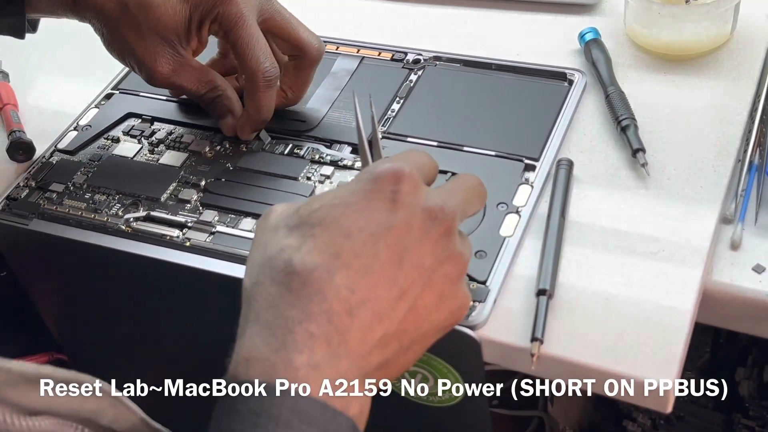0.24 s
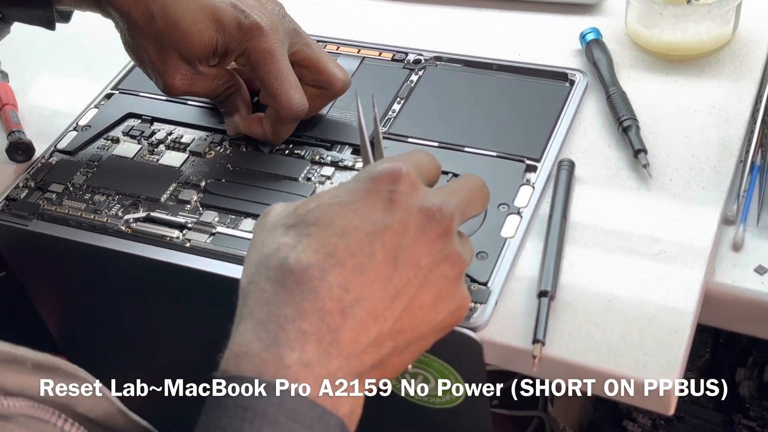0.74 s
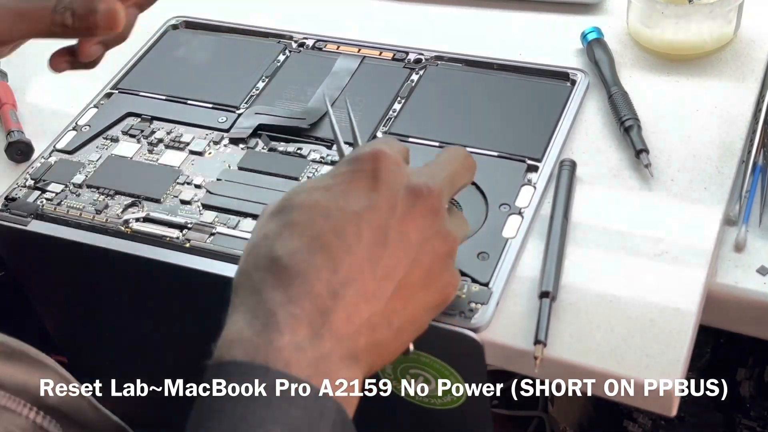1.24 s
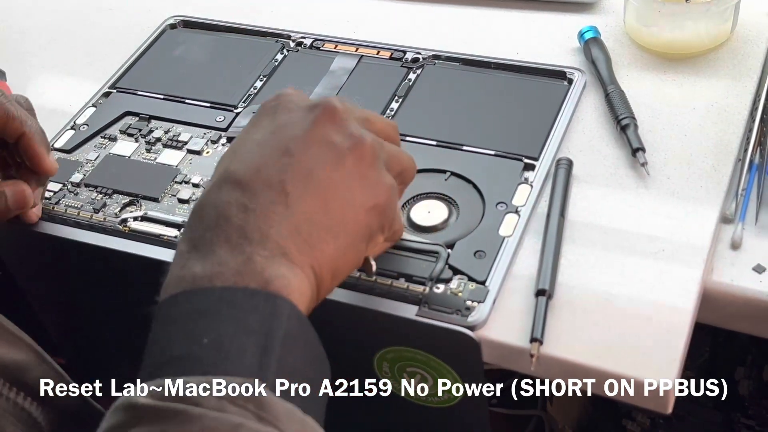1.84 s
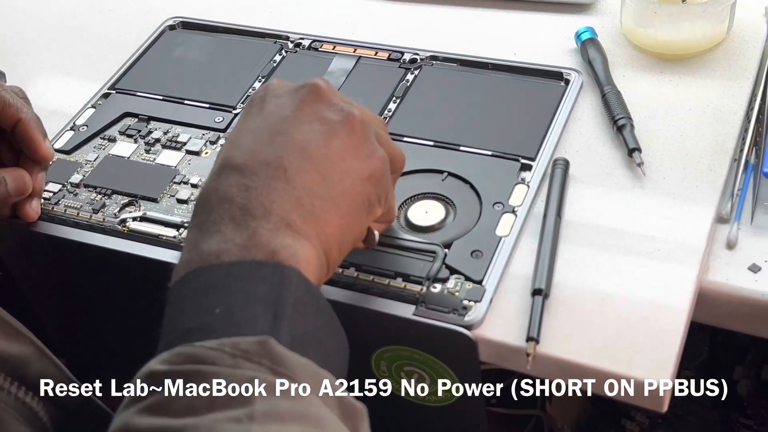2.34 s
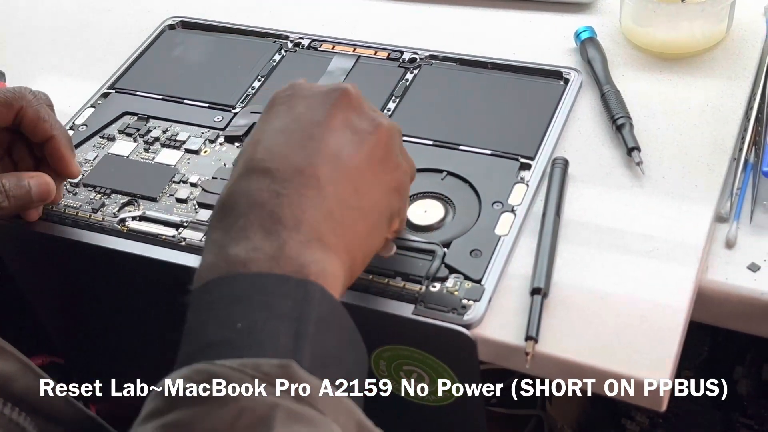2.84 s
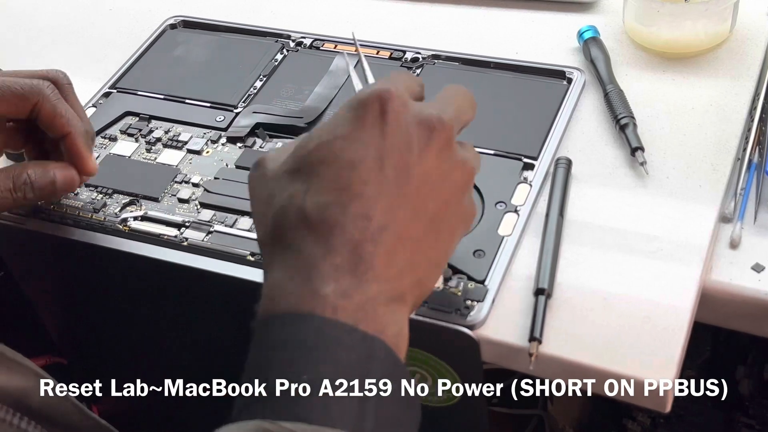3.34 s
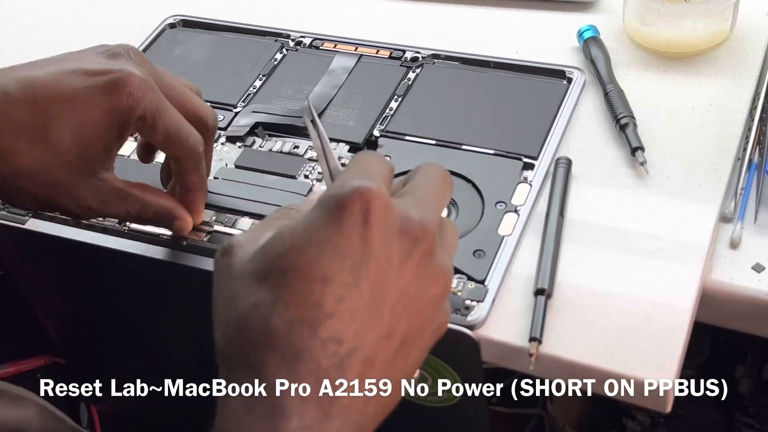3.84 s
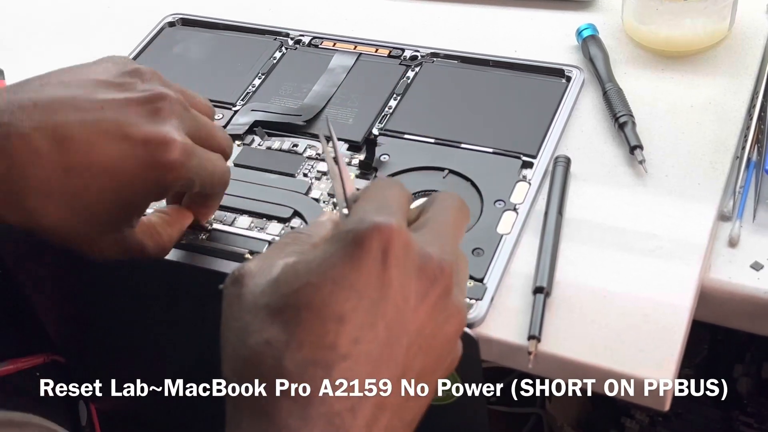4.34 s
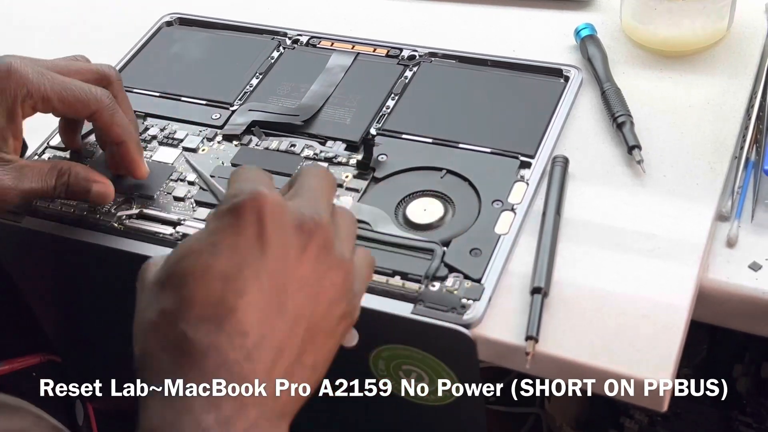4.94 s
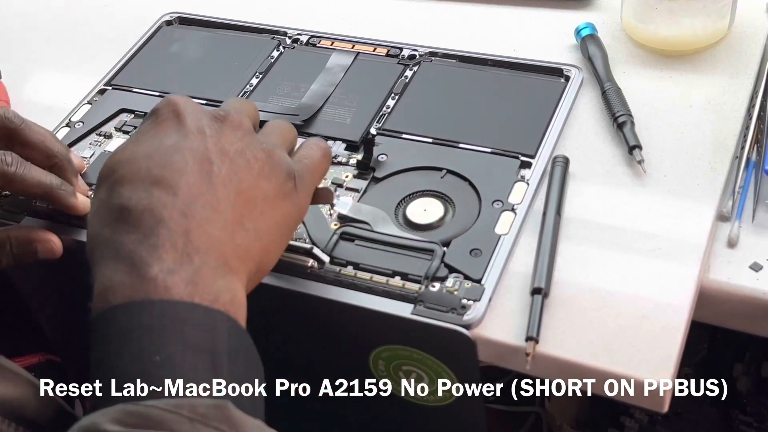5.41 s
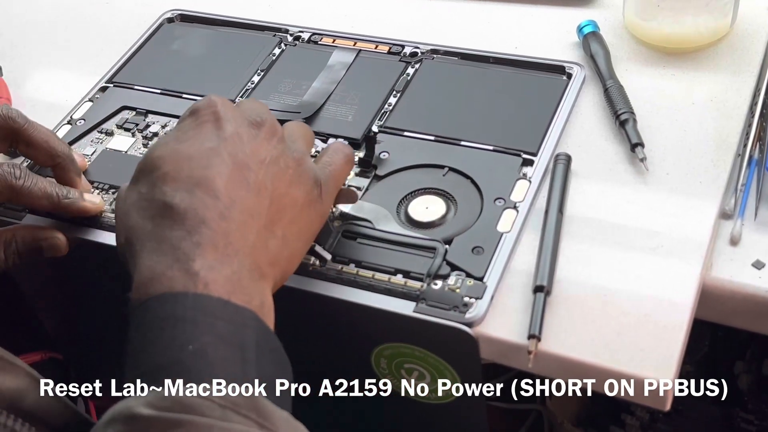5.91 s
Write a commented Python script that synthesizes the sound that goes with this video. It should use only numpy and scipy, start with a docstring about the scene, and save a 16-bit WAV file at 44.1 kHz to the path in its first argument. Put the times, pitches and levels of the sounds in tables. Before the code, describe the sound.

Small-part repair on a workbench, heard by one close microphone without reverberation. Isolated metallic clicks and snaps come in short double or triple strikes, separated by faint airy brushing of hand and sleeve. The loudest two fall just after three seconds and at about four and a half, the latter followed by fine tape crackle. Uneven low thuds of the shaken mount and quiet room hum continue until the almost click-free end.

```python
"""Tweezers on an opened laptop

On a bench, steel tweezers tap, pry and unsnap small plugs on a metal laptop's board: rough contacts ring
sharp modes, crack and rustle. A thin shield can buzzes, hand and sleeve slide (moving bands of friction)
and a taped cable peels in a fine crackle. The bench shakes the microphone mount in slow low throbs.
Mains hum, room noise and hiss lie beneath, swelling and dipping. The sources are dry and close, without
added reverberation; one microphone feeds both channels alike."""
import sys
import numpy as np
from scipy import signal
from scipy.fft import rfft, irfft
from scipy.io import wavfile
from scipy.ndimage import uniform_filter1d

SR = 44100
rng = np.random.default_rng(int(sys.argv[2]) if len(sys.argv) > 2 else 0)


def persist_wave(psi):
    """Save psi, clipped to +-1, as 16-bit WAV."""
    counts = np.round(np.clip(psi, -1, 1) * 32767).astype(np.int16)
    wavfile.write(sys.argv[1], SR, np.atleast_2d(counts).T)


N = 272097  # samples

# Touches of the tweezers: (time [s], case [dB], board [dB], plug [dB], clip [dB], tweezer tips [dB],
# contact decay [ms], ring time [share of each mode's t60], rustle [dB], favoured pitch [Hz])
TOUCHES = [(0.8129, -78, -37, -58, -53.5, -51.5, 1.6, 0.68, -12.5, 6240),
           (0.8180, -59.5, -52, -45, -63, -49.5, 4.4, 0.23, -6.5, 2000),
           (0.885, -60.5, -69.5, -62, -100, -79, 2.1, 0.43, 1, 1990),
           (0.9610, -75, -90, -80, -87, -90, 2.2, .39, 7.5, 8950),
           (1.0247, -64, -66, -59, -73, -69.5, 2.1, 0.45, 8.5, 7440),
           (1.0362, -90, -58, -62.5, -66, -66, 2.7, 0.27, 12, 3260),
           (1.0507, -94, -37, -42.5, -47, -52, 2.1, 0.75, -11, 5300),
           (1.1136, -81, -58, -63.5, -74, -75, 1.4, 0.78, 0, 2080),
           (1.1933, -71, -68, -67, -79, -90, 1.84, 0.37, 3, 3250),
           (1.4710, -68, -78, -71, -80, -84, 2.6, 0.8, 5, 3420),
           (2.071, -49, -59, -47, -54.5, -53.5, 1.57, 0.43, -12, 8920),
           (2.079, -61, -57.5, -59, -61, -74, 2.1, 1, -6, 1680),
           (2.4150, -79, -89, -88, -82, -81, 1.54, 0.42, -4, 8950),
           (2.4450, -85, -87, -95, -79, -83, 1.8, .55, -9, 8850),
           (2.9304, -61.5, -40.5, -38.5, -58.5, -62, 1.05, .39, -3.5, 6100),
           (2.9418, -46.5, -34, -46.5, -59.5, -65, .21, 0.37, -11, 1829),
           (2.965, -48, -36, -62.5, -69, -70, .17, 0.36, -19, 1602),
           (2.9867, -50, -37, -60, -67.5, -74, .17, 0.23, -21, 1630),
           (3.2680, -72, -63.5, -62.5, -58, -55, 2.12, .59, -6, 7750),
           (3.2726, -58, -59.5, -45.5, -57, -41.5, 2.5, .29, -8.5, 7790),
           (3.276, -37.5, -25.5, -27, -41, -25.5, .64, 0.74, -13.5, 3240),
           (3.298, -48.5, -42, -46, -43, -50, 2.9, .58, -8, 1124),
           (3.7373, -73.5, -64.5, -73, -86, -93, 1.5, 0.48, -13, 2304),
           (4.35, -65, -57.5, -74.5, -56.5, -55, 1.85, .59, -9, 2043),
           (4.3602, -55, -61.5, -68.5, -68.5, -71, 2.1, 0.58, -15.5, 2000),
           (4.471, -73.5, -66, -81, -84, -85, 1.4, 0.49, -6, 8950),
           (4.5408, -74.5, -70, -60.5, -57.5, -43, 2.6, .43, -10, 7350),
           (4.5470, -29, -32.5, -43, -33.5, -30.5, 1.6, 0.47, -15.5, 9000),
           (4.5574, -39, -50, -43.5, -49.5, -42.5, .62, 0.62, -9, 1150),
           (5.8202, -78.5, -91, -87, -85, -103, 4.5, 0.92, -3, 5100),
           (5.933, -84, -82, -94, -88, -90, 4.5, .9, -1, 5120),
           (5.956, -81, -75, -82, -77.5, -83, 4.5, 0.97, -5, 5120)]
# Where case, board, plug, clip and tips ring: (pitch [Hz])
PARTS_HZ = [1074, 2050, 3150, 5500, 8600]
# Modes of the assembly: (pitch [Hz], level [dB], full t60 [s])
MODES = [(949, -3.5, .07), (1013, -4, 0.087), (1122.6, -1, .09), (1222, 1, 0.071), (1360, -13, 0.19),
         (1671.3, -2, 0.031), (1895, 9, 0.019), (2095, -10.5, 0.11), (2577, -0.5, 0.034),
         (2825, -9.5, 0.051), (3420, 5, 0.03), (3615, -6, 0.063), (4120, -3, 0.062), (4150, -0.5, 0.026),
         (4740, -4.5, 0.062), (5240, -2.5, 0.043), (6020, -5.5, 0.06), (6460, 3, 0.027), (6966, -3, .035),
         (7440, 0.5, 0.03), (7730, 7, 0.017), (8300, -6, 0.022), (9150, 0.5, 0.039), (9710, -2, .025),
         (10900, -19.5, .025), (11020, -3.5, 0.043), (12800, -10, .025), (15000, -5.5, .025)]
# Decay of the rustle before its share is taken: (frequency [Hz], full t60 [s])
RUSTLE_T60 = [(800, 1), (2500, 0.22), (5000, 0.41), (8000, 0.28), (14000, 0.063)]
# Modes of the thin shield can: (pitch [Hz], level [dB], t60 [s], width [Hz])
SHIELD_MODES = [(2570, -58.5, 0.46, 85), (2640, -60.5, .3, 99)]
# Strokes of hand and sleeve: (start [s], swell [s], fade [s], upper band [dB], its first [Hz], its last [Hz],
# lower band [dB], its first [Hz], its last [Hz])
STROKES = [(1.057, 0.064, 0.13, -80, 5250, 4900, -72.5, 2050, 2250),
           (1.143, 0.41, .25, -84.5, 4440, 4750, -87, 2200, 2120),
           (3.31, 0.034, 0.19, -79, 4100, 4620, -78, 3300, 3000),
           (3.5, 0.14, 0.25, -85.5, 4500, 4580, -83, 2150, 2420),
           (3.82, 0.19, .17, -91, 4470, 4700, -80.5, 1380, 1290),
           (4.36, 0.061, .11, -88.5, 4690, 4600, -81, 1890, 1700),
           (4.66, 0.087, 0.088, -96.5, 5020, 4950, -95, 2100, 2000),
           (5.191, 0.23, 0.086, -83.5, 4650, 4460, -88, 1800, 2320)]
# Spectrum of the broad sliding band: (frequency [Hz], level [dB per Hz])
STROKE_COLOUR = [(1760, -44), (3000, -5.5), (3140, -3.5), (3390, -6.5), (3840, 3.5), (4690, -12.5),
                 (4990, 3), (5860, -13), (6500, -14), (8450, -33), (14300, -120)]
# Tape-backed cable peeling: (time [s], level [dB])
PEEL_LEVEL = [(4.57, -55), (4.592, -64.5), (4.656, -67.5), (4.718, -88), (4.78, -95)]
# Spectrum of the peel: (frequency [Hz], level [dB per Hz])
PEEL_COLOUR = [(1180, -47), (2000, -12), (2170, -8), (2860, -22.5), (3710, -2), (8800, 8.5), (11100, -23.5),
               (14000, -32)]
# Shaking of the mount before its uneven throbs: (time [s], level [dB])
SHAKE_LEVEL = [(0, -63), (.1, -70.5), (.15, -48), (.29, -39), (.34, -50.5), (.4, -45), (.57, -47),
               (.62, -60.5), (.8, -58), (.88, -47), (.98, -39), (1.05, -50.5), (1.17, -38), (1.22, -68),
               (1.44, -36.5), (1.61, -44.5), (1.66, -58.5), (1.79, -51.5), (1.9, -60), (2.56, -55),
               (2.64, -47.5), (2.86, -34.5), (3.1, -48), (3.36, -53), (3.44, -62.5), (3.9, -59),
               (4.04, -50), (4.1, -64.5), (4.66, -54.5), (5.12, -68.5), (5.19, -51), (5.34, -45.5),
               (5.86, -70), (6.04, -60.5), (6.12, -47)]
# Pitch of the mount's swing before it wavers: (time [s], pitch [Hz])
SHAKE_PITCH = [(0, 43.11), (1.2, 38.87), (2.4, 37.41), (2.7, 33.22), (3.8, 31.72), (5.3, 35.69),
               (6.17, 35.67)]
# Swells and dips shared by room noise and hum: (time [s], level [dB])
ROOM_LEVEL = [(0.0, -70), (0.1, -71), (0.14, -62), (0.77, -63.5), (1.3, -64.5), (1.56, -61.5),
              (1.92, -67.5), (2.51, -65), (2.87, -62), (3.3, -64.5), (3.52, -69), (3.95, -66.5),
              (4.95, -66.5), (5.16, -71.5), (5.22, -61), (5.84, -71), (6.14, -64.5)]
# Spectrum of the room noise: (frequency [Hz], level [dB per Hz])
ROOM_COLOUR = [(32, -25.5), (55, -1), (76, -14.5), (106, -13.5), (124, -18), (167, -16), (195, -11.5),
               (273, -14), (306, -16), (455, -22.5), (560, -23.5), (2440, -47.5), (5000, -57),
               (6500, -84.5), (11000, -120)]
# Spectrum of the hiss: (frequency [Hz], level [dB per Hz])
HISS_COLOUR = [(1800, -35.5), (3000, -15), (4000, -5), (5500, -0.5), (7100, 2), (9700, -2), (13800, -4.5),
               (14800, -14.5), (16300, -22)]
# Mains hum before it wavers: (pitch [Hz], level against the room level [dB])
HUM = [(100.3, -4.5), (200.4, -6.5), (300.6, -13)]


def gain_of(db):
    """Turns decibels into gain."""
    return 10 ** (np.asarray(db) / 20)


def evened(x):
    """Scales to rms 1."""
    return x / np.sqrt(np.mean(x ** 2) + 1e-20)


def read(points, hz):
    """Reads a spectrum on a log-frequency axis."""
    f, value = np.transpose(points)
    return np.interp(np.log(hz + 1), np.log(f + 1), value)


def curve(rows):
    """Reads a curve over time at every sample."""
    s, value = np.transpose(rows)
    return np.interp(np.arange(N) / SR, s, value)


def coloured(x, points):
    """Filters by a spectrum and evens to rms 1."""
    hz = np.fft.rfftfreq(len(x), 1 / SR)
    return evened(irfft(rfft(x) * gain_of(read(points, hz)), len(x)))


def wander(width_s):
    """Slow random curve, rms 1: noise smoothed twice."""
    size = round(width_s * SR)
    smooth = uniform_filter1d(rng.standard_normal(N), size=size)
    return evened(uniform_filter1d(smooth, size=size))


def slips(per_s, spread_db):
    """Friction as dense tiny slips of uneven size."""
    strength = rng.standard_normal(N) * gain_of(spread_db * rng.exponential(1, N))
    return strength * (rng.random(N) < per_s / SR)


def fade(start, end, fade_s=0.00786):
    """Opens between start and end, with short ramps inside."""
    t = np.arange(N) / SR
    return np.clip(np.minimum(t - start, end - t) / fade_s, 0, 1)


def resonate(x, hz, width_hz):
    """A moving resonance, rms 1: shifts the curve hz down to zero, smooths twice, shifts back."""
    turn = np.exp(2j * np.pi * np.cumsum(hz) / SR)
    r = np.exp(-np.pi * width_hz / SR)
    smooth = signal.lfilter([1], np.convolve([1, -r], [1, -r]), x / turn)
    return evened((turn * smooth).real)


LEAD, TAP_SIZE = 512, 16384  # samples ahead of a contact, and in the whole tap


def contact(ms, contact_ms, run_up=0.45):
    """Rough noise that grows into the contact and dies after it; run_up is a share of the contact decay."""
    rise_ms, fall_ms = max(run_up * contact_ms, .03), max(contact_ms, .03)
    return rng.standard_normal(TAP_SIZE) * np.exp(np.where(ms < 0, ms / rise_ms, -ms / fall_ms))


def loose_rustle(ms, time_share=0.55, rise_ms=3.0):
    """Loose noise after the contact, each frequency dying at its own pace."""
    f, frame_s, z = signal.stft(rng.standard_normal(TAP_SIZE), SR, nperseg=256)
    t60 = time_share * read(RUSTLE_T60, f)[:, None]
    z = z * gain_of(-60 * np.maximum(frame_s - LEAD / SR, 0) / t60)
    noise = signal.istft(z, SR, nperseg=256)[1][:TAP_SIZE]
    return noise * (1 - np.exp(-np.maximum(ms, 0) / rise_ms))


def ring_modes(force, ring_time, detune=0.006, build_cycles=2.7):
    """The contact force rings the decaying modes; the bending wave needs a few cycles to fill each part."""
    t = np.arange(TAP_SIZE) / SR
    hz, db, t60 = np.transpose(MODES)[:, :, None]
    hz = hz * (1 + detune * rng.standard_normal(hz.shape))  # the grip shifts the modes a little
    modes = gain_of(db - 60 * t / (t60 * ring_time)) * np.sin(2 * np.pi * hz * t)
    modes = modes * (1 - np.exp(-hz * t / (build_cycles * ring_time)))
    # every mode takes its due share of the blow
    reach = abs(np.exp(2j * np.pi * hz * t[:len(force)]) @ force)[:, None]
    response = (modes / (reach + 0.32 * np.linalg.norm(force))).sum(0)
    return signal.fftconvolve(force, response)[:TAP_SIZE]


def strike_colour(parts_db, favoured_hz, favour_db=8.5, favour_width=0.088, hard_bright=0.2):
    """Gains from how hard each part rings; the struck spot favours one pitch, harder tips brighten the top."""
    tips_db = parts_db[-1]
    top_db = tips_db + hard_bright * (tips_db + 54.5)  # hard_bright: dB gained per dB of harder blow
    colour = list(zip(PARTS_HZ, parts_db))
    colour += [(10200, tips_db), (11000, top_db - 16.0), (14500, top_db - 15.5), (16300, top_db - 32.0)]
    f = np.fft.rfftfreq(TAP_SIZE, 1 / SR)
    spot_db = favour_db * np.exp(-(np.log((f + 1) / favoured_hz) / favour_width) ** 2 / 2)
    return gain_of(read(colour, f) + spot_db)


def tap(row, crack_db=-2.5):
    """A short rough contact rings the modes and is heard bare as a crack; a loose rustle follows."""
    s, *parts_db, contact_ms, ring_time, rustle_db, favoured_hz = row
    ms = (np.arange(TAP_SIZE) - LEAD) / SR * 1000  # time from the contact
    crack = contact(ms, contact_ms)
    rustle = gain_of(rustle_db) * loose_rustle(ms)
    ring = ring_modes(crack[:2 * LEAD], ring_time)
    sound = ring + gain_of(crack_db) * crack + rustle
    return round(s * SR) - LEAD, irfft(rfft(sound) * strike_colour(parts_db, favoured_hz), TAP_SIZE)


def taps(small_hz=930.0):
    """All touches of the tweezers; parts this small radiate no bass."""
    out = np.zeros(N + TAP_SIZE)
    for row in TOUCHES:
        at, sound = tap(row)
        out[at:at + len(sound)] += sound
    return signal.sosfilt(signal.butter(6, small_hz, "highpass", fs=SR, output="sos"), out[:N])


def shield(start_s=3.281, rise_s=0.003):
    """A thin shield can buzzes after a hard snap: close modes of loose sheet, wavering as they die."""
    t = np.maximum(np.arange(N) / SR - start_s, 0)
    noise = rng.standard_normal(N)
    buzz = np.zeros(N)
    for hz, db, t60, width_hz in SHIELD_MODES:
        buzz += gain_of(db - 60 * t / t60) * resonate(noise, np.full(N, hz), width_hz)
    return (1 - np.exp(-t / rise_s)) * buzz


def slides(width_hz=610.0, upper_width_hz=460.0, under=0.79, under_db=-13.0, broad_db=1.5,
           patchy_db=0.5, uneven_db=0.5, ends_db=-13, shape=1.8):
    """Friction in a broad airy band with two strands, and a lower band set by the hollow of the hand."""
    friction, out, t = slips(9700.0, 1.2), np.zeros(N), np.arange(N) / SR
    broad = gain_of(broad_db + patchy_db * wander(0.016)) * coloured(friction, STROKE_COLOUR)
    pressure_db = uneven_db * wander(0.036)
    for start, swell_s, fade_s, upper_db, upper_from, upper_to, lower_db, lower_from, lower_to in STROKES:
        top, end = start + swell_s, start + swell_s + fade_s
        at = slice(round(start * SR), round(end * SR))
        rub = friction[at]
        upper_hz = np.linspace(upper_from, upper_to, len(rub))
        lower_hz = np.linspace(lower_from, lower_to, len(rub))
        strand = resonate(rub, upper_hz, upper_width_hz)
        under_strand = gain_of(under_db) * resonate(rub, under * upper_hz, upper_width_hz)
        upper = gain_of(upper_db) * (broad[at] + strand + under_strand)
        lower = gain_of(lower_db) * resonate(rub, lower_hz, width_hz)
        away = abs(np.interp(t[at], [start, top, end], [-1, 0, 1]))  # 0 at the fullest, 1 at the ends
        level = gain_of(ends_db * away ** shape + pressure_db[at])  # a higher shape sinks later
        out[at] += fade(start, end)[at] * level * (upper + lower)
    return out


def peel():
    """Glue of a tape-backed cable lets go in a fine crackle."""
    crackle = coloured(slips(11000.0, 1.5), PEEL_COLOUR)
    return gain_of(curve(PEEL_LEVEL)) * fade(PEEL_LEVEL[0][0], PEEL_LEVEL[-1][0]) * crackle


def shake(waver=0.0981, second_db=-11.0, lumps_db=-4.5, throb_db=1.5, upper_db=-17, upper_growth=0.1):
    """A low swing of the mount, squared off by upper partials, with loose lumps around it."""
    level_db = curve(SHAKE_LEVEL) + throb_db * wander(.03)  # uneven throbs
    hz = curve(SHAKE_PITCH) * (1 + waver * wander(.02))
    turn = 2 * np.pi * (np.cumsum(hz) / SR + rng.random())
    upper = np.sin(3 * turn) + gain_of(second_db) * np.cos(2 * turn)
    # upper partials gain upper_growth dB for each dB of stronger swing
    upper_gain = gain_of(upper_db + upper_growth * (level_db + 45.5))
    swing = np.sqrt(2) * (np.sin(turn) + upper_gain * upper)
    lumps_colour = [(8, -30.5), (22, 3.0), (38, 2.5), (60, -1.0), (80, -25.5), (125, -16.0),
                    (200, -34.0), (400, -73.5), (1500, -130.)]  # (frequency [Hz], level [dB per Hz])
    lumps = coloured(rng.standard_normal(N), lumps_colour)
    return gain_of(level_db) * (swing + gain_of(lumps_db) * lumps)


def background(room_db=3.0, flutter_db=1., hiss_db=-93.5, hiss_follows=0.46):
    """Room noise with mains hum as wavering sines, and a hiss that partly follows the swells."""
    level_db, t = curve(ROOM_LEVEL), np.arange(N) / SR
    hum = np.zeros(N)
    for hz, db in HUM:
        tone = np.sqrt(2) * np.sin(2 * np.pi * (hz * t + rng.random()))
        hum += gain_of(db + 0.91 * wander(.06)) * tone
    air = gain_of(room_db + flutter_db * wander(.03)) * coloured(rng.standard_normal(N), ROOM_COLOUR)
    hiss_gain = gain_of(hiss_db + hiss_follows * (level_db - level_db.mean()))
    hiss = hiss_gain * coloured(rng.standard_normal(N), HISS_COLOUR)
    return gain_of(level_db) * (air + hum) + hiss


def scene():
    """Everything at the one microphone, the same on both channels."""
    mono = taps() + shield() + slides() + peel() + shake() + background()
    return np.array([mono, mono])


def record(dry, edge_hz=16400):
    """Limits the band with a steep lowpass."""
    padded = np.pad(dry, ((0, 0), (255, 255)), "reflect", reflect_type="odd")
    lowpass = signal.firwin(511, edge_hz, window=("kaiser", 9), fs=SR)
    return signal.oaconvolve(padded, lowpass[None], "valid", axes=1)


dry = scene()
out = record(dry)
persist_wave(out)
```